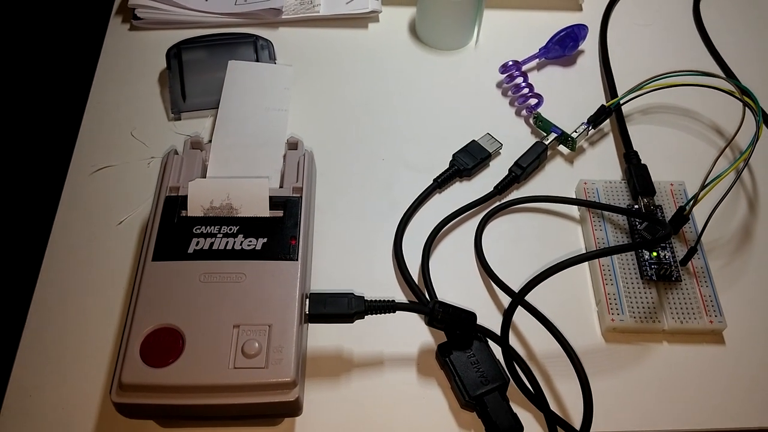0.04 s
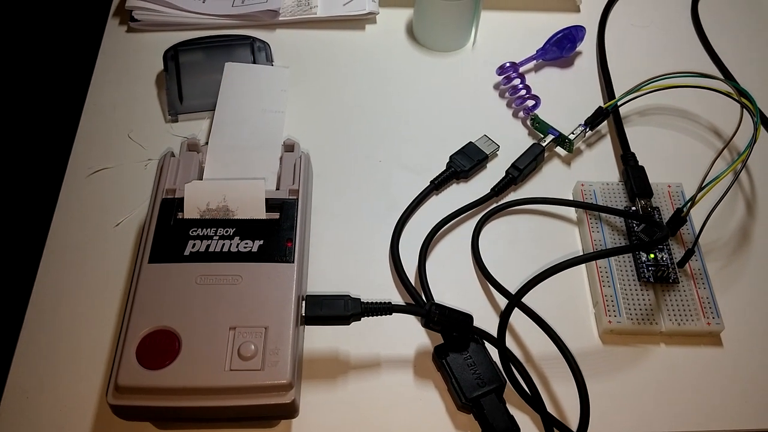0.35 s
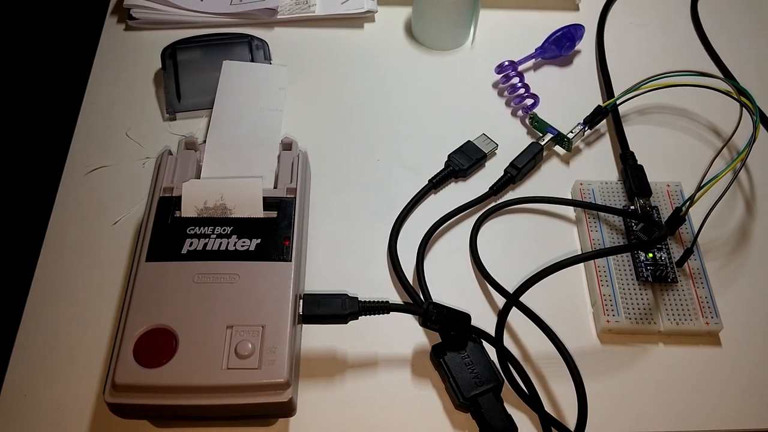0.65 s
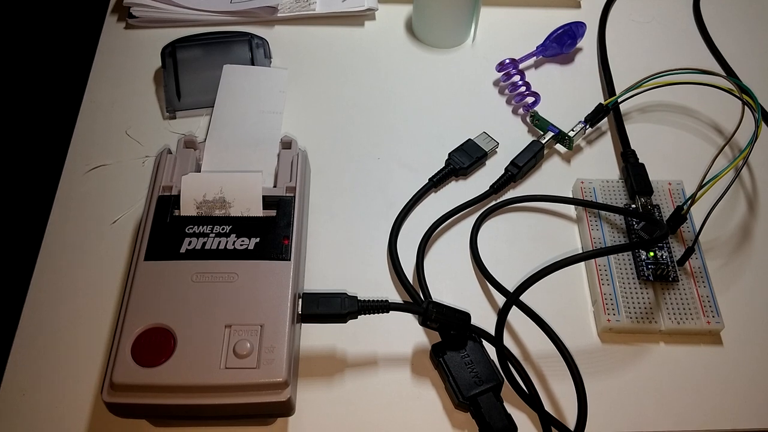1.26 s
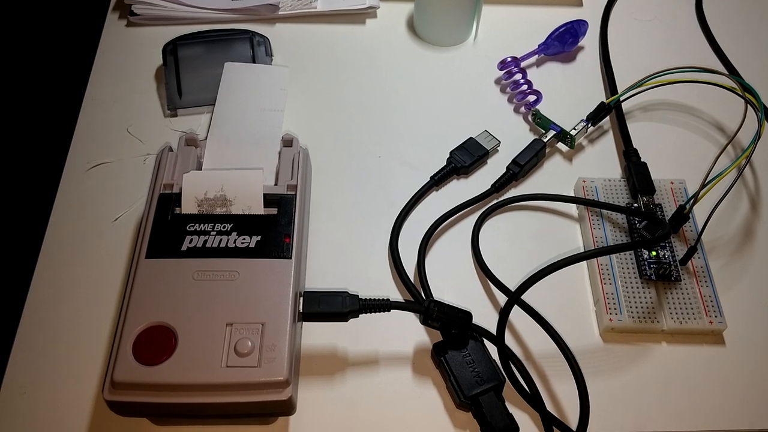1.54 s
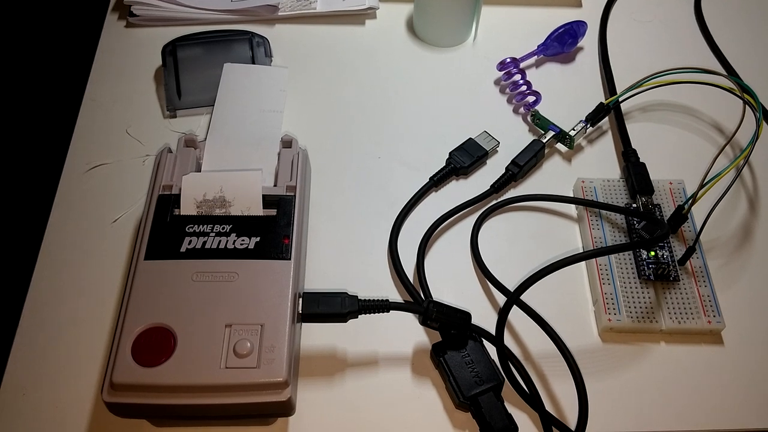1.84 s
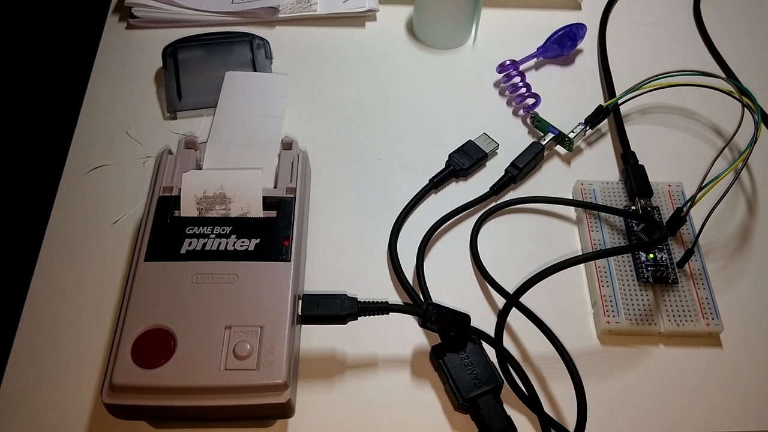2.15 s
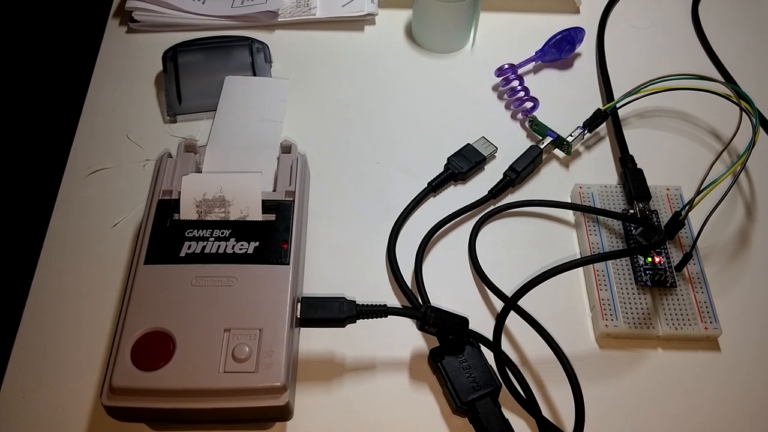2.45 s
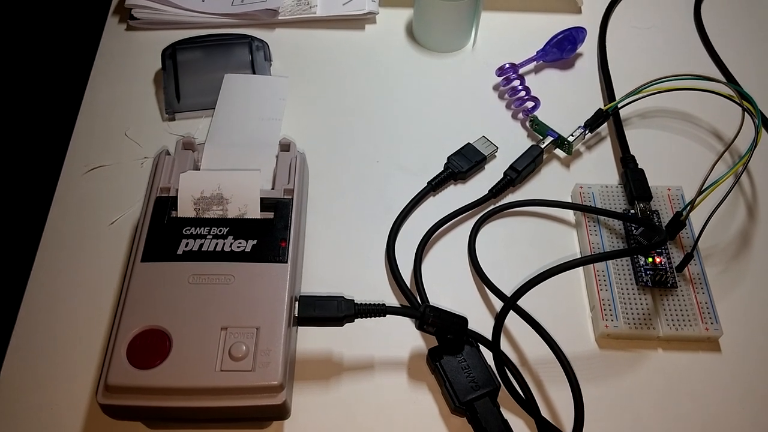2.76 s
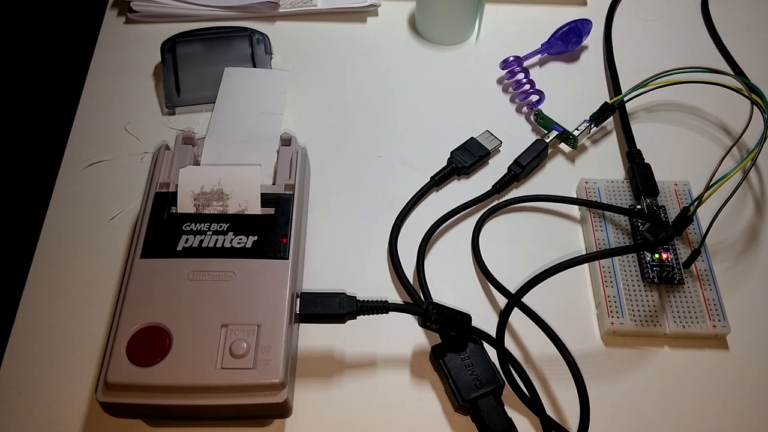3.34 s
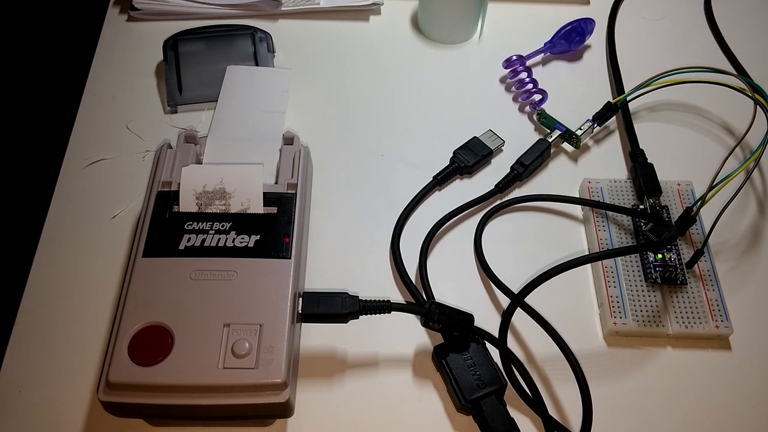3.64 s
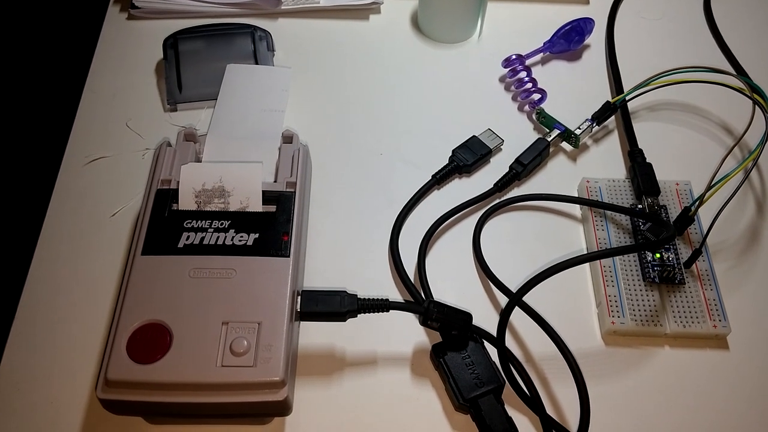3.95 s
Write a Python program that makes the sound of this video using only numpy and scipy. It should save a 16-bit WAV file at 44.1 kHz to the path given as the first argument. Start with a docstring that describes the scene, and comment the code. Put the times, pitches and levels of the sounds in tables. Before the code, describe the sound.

A small thermal printer feeds paper from the start, its motor whining through plastic gears that slow slightly and rattle around 1 and 2 seconds. The paper ticks faintly twice. Short thumping pops come on the left at about 1.4, 2 and 2.3 seconds, when the motor stops. Quiet room noise with a faint hum remains, broken by the loudest pop at 3.5 seconds.

```python
"""Thermal printer on a desk

The printer feeds paper for just over two seconds, then coasts to a stop. Its motor whines through
plastic gears, which slow a little and rattle as the load rises twice; the paper ticks twice.
Four short thumping pops sound on the left, the last and loudest after the printer has stopped.
Quiet room noise and a faint mains hum lie underneath."""
import sys
import numpy as np
from scipy import signal
from scipy.fft import rfft, irfft
from scipy.io import wavfile

SR = 44100
rng = np.random.default_rng(int(sys.argv[2]) if len(sys.argv) > 2 else 0)


def store_wav(level_fs):
    """Save 16-bit WAV to argv[1]."""
    pcm = np.round(np.clip(np.atleast_2d(level_fs), -1, 1) * 32767)
    wavfile.write(sys.argv[1], SR, pcm.T.astype(np.int16))


N = 176400
T = np.arange(N) / SR
BINS_HZ = np.arange(N // 2 + 1) * SR / N

# Room noise. Each row: frequency in Hz, level in dB per Hz.
ROOM_SPECTRUM = [(20, -113), (50, -104), (75, -106), (140, -99), (270, -95.5), (700, -103), (2000, -106),
                 (5000, -111), (8000, -118), (13000, -122), (16000, -120)]
# Room, then printer and paper. Each row: frequency in Hz, left-right correlation.
ROOM_CORRELATION = [(60, 0.2), (300, 0.27), (900, .03), (15000, 0.25)]
PRINTER_CORRELATION = [(60, 0.88), (140, 1), (330, 1), (500, 0.91), (780, 0.55), (1300, 0.35),
                       (1800, -0.02), (2500, 0.66), (4200, -0.7), (6400, 0.0033), (9800, 0.079),
                       (15000, -0.17)]
# Motor. Each row: time in seconds, speed in turns per second.
MOTOR_SPEED = [(.05, 124), (.12, 128), (.16, 129.8), (.29, 130.1), (.73, 129.9), (.79, 131.4), (.9, 130.2),
               (.97, 127.7), (1.15, 126.9), (1.21, 132.2), (1.28, 130.15), (1.58, 129.9), (1.72, 130.15),
               (1.84, 129.5), (1.9, 131.4), (2.02, 130), (2.08, 127.1), (2.27, 126.5), (2.4, 121.5)]
# Gears. Each row: time in seconds, load from 0 (free) to 1 (labouring).
GEAR_LOAD = [(.05, 0.74), (.16, 0.1), (.77, 0.11), (.84, 0.36), (.96, 0.28), (.995, 0.79), (1.16, 0.93),
             (1.2, 0.32), (1.3, 0.15), (1.84, 0.076), (1.98, 0.33), (2.05, 0.19), (2.085, 0.85),
             (2.28, 0.86)]
# Rubbing through the case. Each row: frequency in Hz, free and loaded base levels in dB per Hz.
CASE_SPECTRUM = [(40, -112, -112), (100, -101, -101), (300, -111, -97.5), (585, -102, -102),
                 (820, -102, -83), (1190, -93, -92), (1450, -85.5, -79.5), (1880, -95, -86.5),
                 (2340, -85, -83.5), (3130, -92.5, -89.5), (3750, -83.5, -80.5), (4120, -87, -84.5),
                 (4840, -86.5, -85.5), (6320, -89.5, -91.5), (8540, -99, -99), (8780, -86.5, -89),
                 (10000, -92, -95.5), (11600, -95, -96.5), (13800, -100, -102), (14600, -84, -87),
                 (15500, -95, -95)]
# Case radiation. Each row: frequency in Hz, left minus right in dB.
CASE_BALANCE = [(4000, 0.5), (8000, 2), (11000, -5), (15000, 8.5)]
# Swells of the loaded rattle. Each row: centre in seconds, half length in seconds, boost in dB.
RASP_SWELLS = [(0.863, 0.077, 1.5), (1.977, 0.1, 2.5), (2.22, 0.047, 1.5)]
# A tooth catches as the load comes on. Each entry: start in seconds.
TOOTH_KNOCKS_S = [0.832, 0.858, 0.882, 0.907, 1.992]
# Strong gear tones. Each row: multiple of motor speed, free and loaded base levels in dB,
# left minus right in dB, left-right correlation.
MESH_TONES = [(1, -65.5, -62.5, -1, 1.0), (2, -76.5, -70.5, 1, 1), (5, -74.5, -73, 0, 0.92),
              (6, -53, -61.5, 4, 0.89), (7, -82, -60.5, 9, 0.77), (8, -68.5, -52.5, -0.5, 0.36),
              (10, -64.5, -69, -8, 0.43), (11, -71, -67, 18, -0.38), (12, -64, -57, 8, 0.12),
              (13, -62, -70, -1, -0.2), (15, -62.5, -65, 5, -0.52), (18, -53.5, -65, 9, 0.93),
              (19, -67.5, -71, 6, -0.67), (20, -51.5, -62.5, 7, 0.9), (21, -67, -61.5, -9, 0.2),
              (26, -65, -73, -1, -0.56), (28, -66.5, -72, -6, 0.76), (29, -74, -55, 3, 0.001),
              (33, -66, -60.5, 1, -0.9), (37, -61.5, -54.5, 7, -0.45), (38, -59, -56, 8, 0.15),
              (40, -57, -56, -5, -0.79), (41, -67.5, -56, -8, -0.86), (44, -72, -56, -5, -0.79),
              (50, -67, -63, 4, 0.44), (70, -65.5, -69, -11, -0.094), (113, -64, -63, 8, -0.2),
              (116, -63, -55, 8, -0.076)]
# Sharp peaks and dips of the case. Each row: centre in Hz, half width in Hz, gain in dB.
CASE_RESONANCES = [(791.3, 4.2, -3), (2371, 16, 4.5), (2618, 13, -10), (5014, 42, -7), (5340, 26, -2)]
# Paper ticks. Each row: start in seconds, envelope gain in dB.
PAPER_TICKS = [(0.541, -36), (1.658, -34.5)]
# Tick colour. Each row: frequency in Hz, relative level in dB.
TICK_SPECTRUM = [(500, -25), (1500, 2), (3500, -19), (5000, 9), (6800, -9), (9000, 3), (11500, -22),
                 (15500, -14)]
# Pops. Each row: start in seconds, height before filtering in dB, decay in seconds, ring gain in dB.
POP_SPIKES = [(1.381, -11.5, 0.00063, -3), (2.0140, -13.5, 0.00064, -5), (2.3487, -21, 0.00051, -3.5),
              (3.4958, 5.5, 0.00069, 0.5)]
# Ring of a pop. Each row: frequency in Hz, relative level in dB, T60 in seconds.
POP_RING_MODES = [(3550, -13, 0.006), (4260, -16, 0.0069)]

CUTOFF_HZ = 15750
MAINS_HZ, MAINS_DB = 50, -84
START_S, STOP_S = 0.051, 2.2795
SPEED_JITTER, JITTER_HZ = 0.0008, 24.9
RATTLE_RISE_S, WHINE_RISE_S, WHINE_LAG_S = 0.024, 0.049, 0.025
COAST_DB_PER_S, WHINE_COAST_DB_PER_S = 205, 500
RASP_FULL_LOAD, KNOCK_DB, KNOCK_DECAY_S = 0.29, 5.5, 0.004
TURN_DEPTH, POLE_DEPTH, ARMATURE_POLES = 0.098, 0.23, 3
CHATTER_DB, CHATTER_HZ = 1.33, 150
WHEEL_HZ, WHEEL_DEPTH = 46.8, 0.09
HUM_HZ, HUM_DB, HUM_WAVER = 233, -68.5, 0.19
MESH_TRIM_DB, BUZZ_BOOST_DB, BUZZ_SPREAD_DB = -0.4, 16, 2.5
FLUTTER_HZ, FLUTTER_PER_KHZ, MAX_FLUTTER = 21, 0.045, 0.5
TICK_RISE_S, TICK_DECAY_S = 0.00065, 0.0058
POP_RISE_S, POP_RIGHT_DB = 0.0002, -69
POP_LOW_CUT_HZ, POP_DAMPING_HZ, POP_TOP_HZ = 57, 28, 12000


def from_db(db):
    """Decibels to gain."""
    return 10 ** (np.asarray(db) / 20)


def at_hz(rows, hz, column=1):
    """Table lookup on a log-frequency axis."""
    rows = np.array(rows)
    return np.interp(np.log(np.maximum(hz, 1)), np.log(rows[:, 0]), rows[:, column])


def drift(rate_hz):
    """Smooth random curve with unit spread."""
    hop, settle = 40, 2000
    pole = np.exp(-2 * np.pi * rate_hz * hop / SR)
    white = rng.standard_normal(N // hop + settle + 2)
    slow = signal.lfilter([1], [1, -2 * pole, pole * pole], white)[settle:]
    return np.interp(np.arange(N) / hop, np.arange(len(slow)), slow / slow.std())


def noise(spectrum, correlation, column=1):
    """Stereo noise of given level per Hz and left-right correlation."""
    mid, side = rfft(rng.standard_normal((2, N)))
    alike = at_hz(correlation, BINS_HZ)
    stereo = np.sqrt(1 + alike) * mid + np.sqrt(1 - alike) * side * [[1], [-1]]
    return irfft(stereo * from_db(at_hz(spectrum, BINS_HZ, column)), N) * np.sqrt(SR) / 2


def pan(left_db):
    """Constant-power gains for a left minus right level."""
    gains = from_db(np.array([[left_db], [-left_db]]) / 2)
    return gains / np.sqrt(np.mean(gains ** 2))


def room():
    """Quiet room noise with mains hum and its octave."""
    mains = np.sin(2 * np.pi * MAINS_HZ * T) + np.sin(2 * np.pi * 2 * MAINS_HZ * T)
    return noise(ROOM_SPECTRUM, ROOM_CORRELATION) + from_db(MAINS_DB) * mains


def run_envelope(rise_s, coast_db_per_s, lag_s=0):
    """Level as the motor spins up, holds and coasts down."""
    rise = 1 - np.exp(-np.maximum(T - START_S - lag_s, 0) / rise_s)
    return rise * from_db(-coast_db_per_s * np.maximum(T - STOP_S, 0))


def repeat_each_turn(rub, angle, repeat_gain=0.5):
    """Rough spots come round again: part of the rubbing repeats one and two turns later."""
    out = rub
    for turns in (1, 2):
        earlier = np.rint(np.interp(angle - 2 * np.pi * turns, angle, np.arange(N))).astype(int)
        out = out + repeat_gain ** turns * rub[:, earlier]
    return out * rub.std() / out.std()


def rattle(angle, load):
    """Teeth and brushes rub through the case, pulsing per turn and pole; a slower wheel adds a throb."""
    coarse = np.clip(load / RASP_FULL_LOAD, 0, 1)
    swell = from_db(sum(db * np.exp(-((T - s) / half_s) ** 2) for s, half_s, db in RASP_SWELLS))
    free = noise(CASE_SPECTRUM, PRINTER_CORRELATION)
    loaded = noise(CASE_SPECTRUM, PRINTER_CORRELATION, column=2)
    rub = free * np.sqrt(1 - coarse) + loaded * np.sqrt(coarse) * swell
    left_db = at_hz(CASE_BALANCE, BINS_HZ)
    rub = irfft(rfft(rub) * from_db(np.array([left_db, -left_db]) / 2), N)
    knocks_db = sum(KNOCK_DB * (T > s) * np.exp(-np.abs(T - s) / KNOCK_DECAY_S) for s in TOOTH_KNOCKS_S)
    pulse = (1 + TURN_DEPTH * np.cos(angle)) * (1 + POLE_DEPTH * np.cos(ARMATURE_POLES * angle))
    pulse *= from_db(CHATTER_DB * drift(CHATTER_HZ))
    pulse /= np.sqrt(np.mean(pulse ** 2))
    throb = 1 + WHEEL_DEPTH * np.cos(2 * np.pi * WHEEL_HZ * T)
    envelope = run_envelope(RATTLE_RISE_S, COAST_DB_PER_S)
    return repeat_each_turn(rub, angle) * from_db(knocks_db) * pulse * throb * envelope


def low_hum(angle, cruise_hz):
    """A wavering low tone that follows the motor speed."""
    tone = from_db(HUM_DB) * np.sqrt(2) * np.sin(angle * HUM_HZ / cruise_hz)
    waver = 1 + HUM_WAVER * drift(FLUTTER_HZ)
    return tone * waver * run_envelope(WHINE_RISE_S, COAST_DB_PER_S, WHINE_LAG_S)


def case_gain_db(hz):
    """Lift or loss as a gliding tone crosses nearby peaks and dips of the case."""
    return sum(db / (1 + ((hz - centre_hz) / half_hz) ** 4)
               for centre_hz, half_hz, db in CASE_RESONANCES
               if abs(hz[N // 4] - centre_hz) < centre_hz / 10)


def whine(angle, speed_hz, cruise_hz, load):
    """Multiples of the motor speed form a fluttering buzz; gear mesh makes some stand out."""
    mesh = {round(k): row for k, *row in MESH_TONES}
    out = np.zeros((2, N))
    for k in range(1, int(CUTOFF_HZ / cruise_hz)):
        hz = k * cruise_hz
        scatter_db = BUZZ_SPREAD_DB * rng.standard_normal()
        if k in mesh:
            free_db, loaded_db, left_db, alike = mesh[k]
            gain_db = MESH_TRIM_DB + case_gain_db(k * speed_hz)
            flutter = np.minimum(FLUTTER_PER_KHZ * hz / 1000 * (1 + 2 * load), MAX_FLUTTER)
        else:
            free_db, loaded_db = at_hz(CASE_SPECTRUM, hz), at_hz(CASE_SPECTRUM, hz, column=2)
            left_db, alike = at_hz(CASE_BALANCE, hz), at_hz(PRINTER_CORRELATION, hz)
            gain_db, flutter = BUZZ_BOOST_DB + scatter_db, MAX_FLUTTER
        level = from_db(gain_db + free_db + (loaded_db - free_db) * load)
        level *= (1 + flutter * drift(FLUTTER_HZ)) * np.sqrt(2 / (1 + flutter ** 2))
        phase = k * angle + rng.uniform(0, 2 * np.pi)
        out += pan(left_db) * level * np.sin([phase, phase - np.arccos(alike)])
    return out * run_envelope(WHINE_RISE_S, WHINE_COAST_DB_PER_S, WHINE_LAG_S)


def printer():
    """Motor speed and gear load drive the rattle, hum and whine."""
    speed_hz = np.interp(T, *np.transpose(MOTOR_SPEED))
    load = np.interp(T, *np.transpose(GEAR_LOAD))
    cruise_hz = np.median(speed_hz[(T > START_S) & (T < STOP_S)])
    jitter = SPEED_JITTER * (1 + 2 * load) * drift(JITTER_HZ)
    angle = 2 * np.pi * np.cumsum(speed_hz * (1 + jitter)) / SR
    drive = low_hum(angle, cruise_hz) + rattle(angle, load) + whine(angle, speed_hz, cruise_hz, load)
    return coast(drive)


def paper_ticks():
    """Paper catches and slips with short bright ticks."""
    scuff = noise(TICK_SPECTRUM, PRINTER_CORRELATION)
    envelope = np.zeros(N)
    for start_s, db in PAPER_TICKS:
        age_s = np.maximum(T - start_s, 0)
        envelope += from_db(db) * (1 - np.exp(-age_s / TICK_RISE_S)) * np.exp(-age_s / TICK_DECAY_S)
    return envelope * scuff / scuff.std()


def pops():
    """Spikes on the left with a brief high ring; a low cut swings each back as a thump."""
    out = np.zeros(N)
    for start_s, db, decay_s, ring_db in POP_SPIKES:
        age_s = np.maximum(T - start_s, 0)
        spike = np.minimum(age_s / POP_RISE_S, 1) * np.exp(-np.maximum(age_s - POP_RISE_S, 0) / decay_s)
        ring = sum(np.sin(2 * np.pi * hz * age_s) * from_db(mode_db - 60 * age_s / t60_s)
                   for hz, mode_db, t60_s in POP_RING_MODES)
        out += from_db(db) * (spike + from_db(ring_db) * ring)
    filters = (4, POP_LOW_CUT_HZ, "high"), (1, POP_DAMPING_HZ, "high"), (1, POP_TOP_HZ, "low")
    for order, hz, kind in filters:
        out = signal.sosfilt(signal.butter(order, hz, kind, fs=SR, output="sos"), out + 1e-18)
    return np.array([out, from_db(POP_RIGHT_DB) * out])


def coast(drive, split_hz=7250, treble_db_per_s=200):
    """With the drive off, the treble dies first."""
    dull = signal.sosfilt(signal.butter(2, split_hz, fs=SR, output="sos"), drive)
    return dull + (drive - dull) * from_db(-treble_db_per_s * np.maximum(T - STOP_S, 0))


def scene():
    """Paper, pops and printer over the quiet room."""
    return room() + paper_ticks() + pops() + printer()


def record(dry):
    """Clip at full scale, then cut the top steeply."""
    low_pass = signal.ellip(10, 0.1, 70, CUTOFF_HZ, fs=SR, output="sos")
    return signal.sosfilt(low_pass, np.clip(dry, -1, 1))


dry = scene()
out = record(dry)
store_wav(out)
```